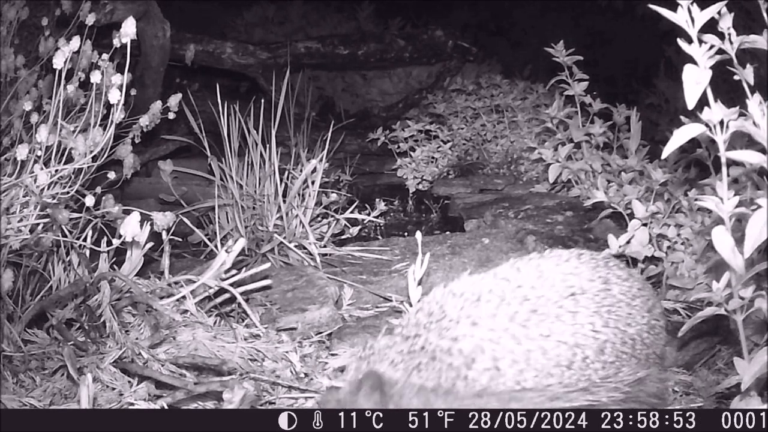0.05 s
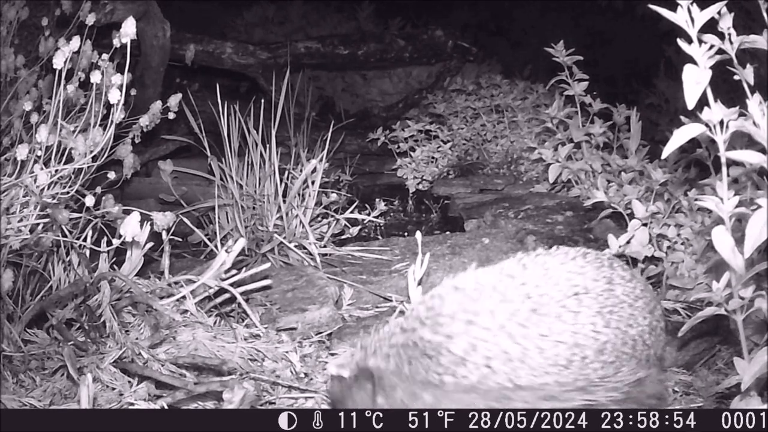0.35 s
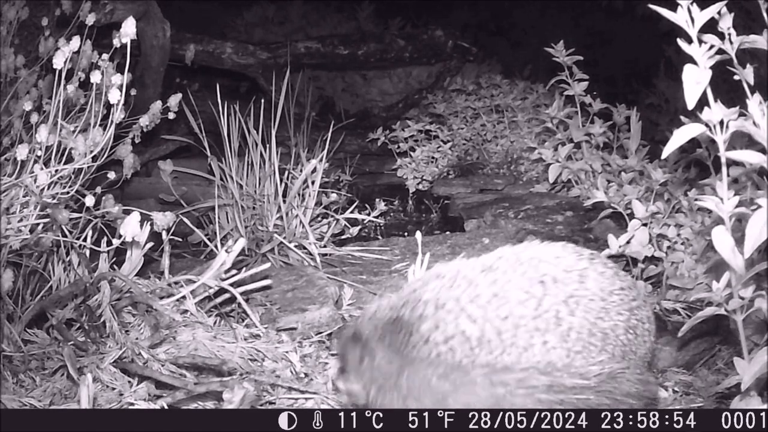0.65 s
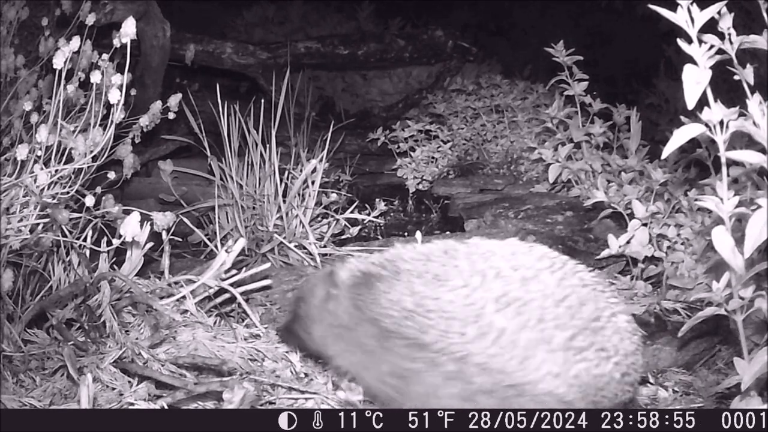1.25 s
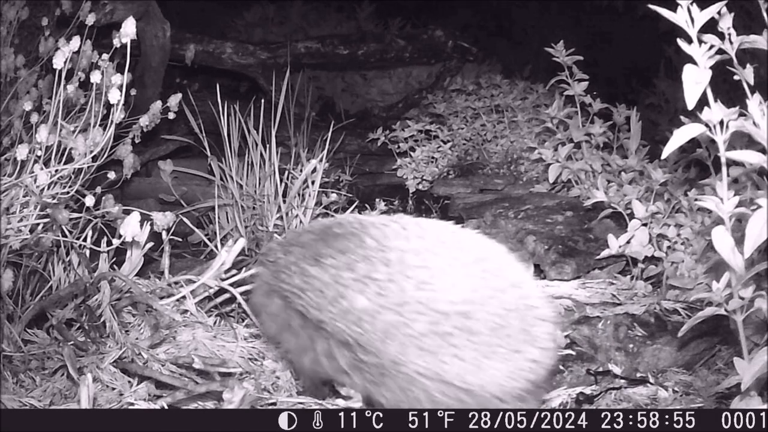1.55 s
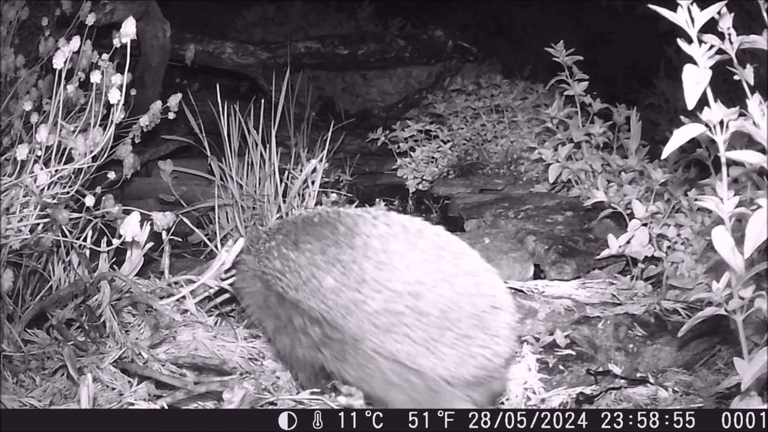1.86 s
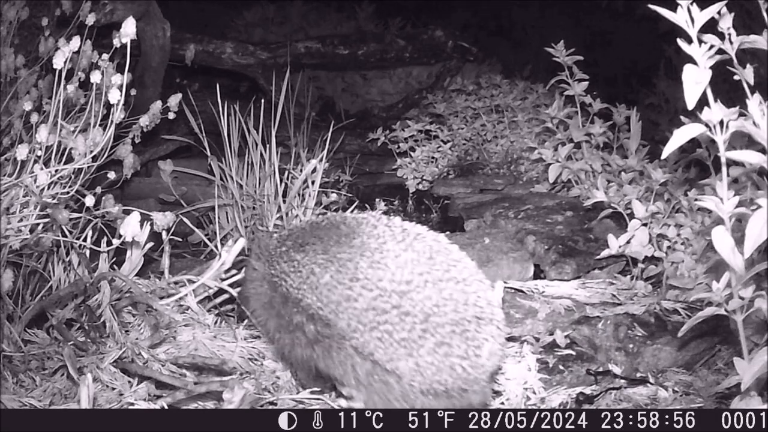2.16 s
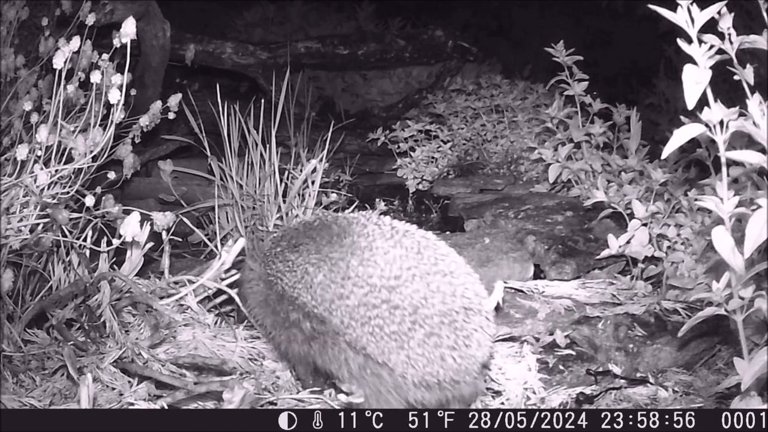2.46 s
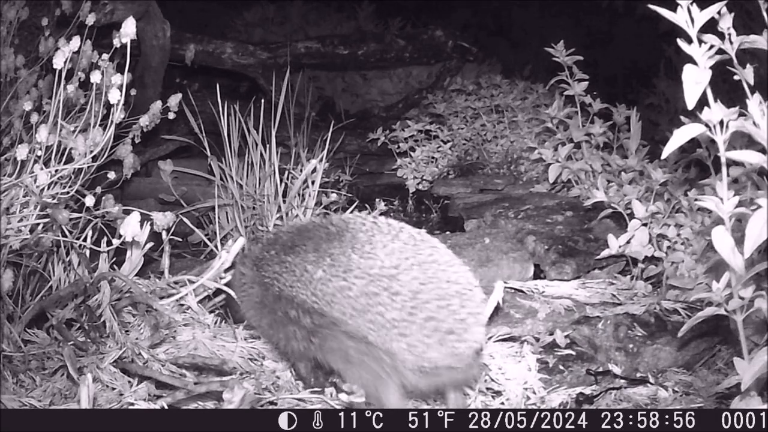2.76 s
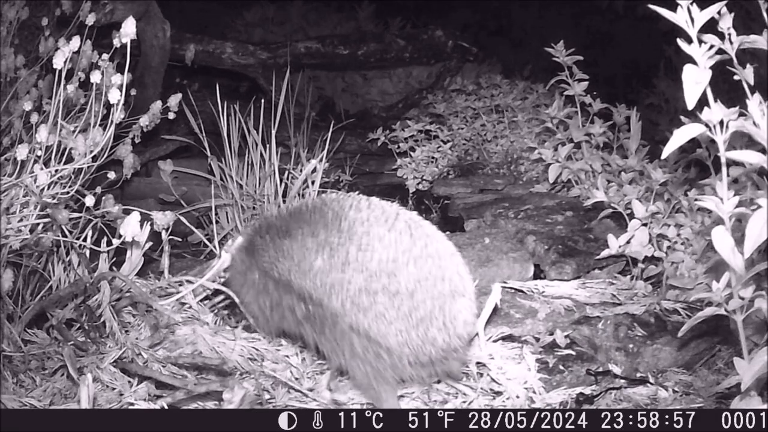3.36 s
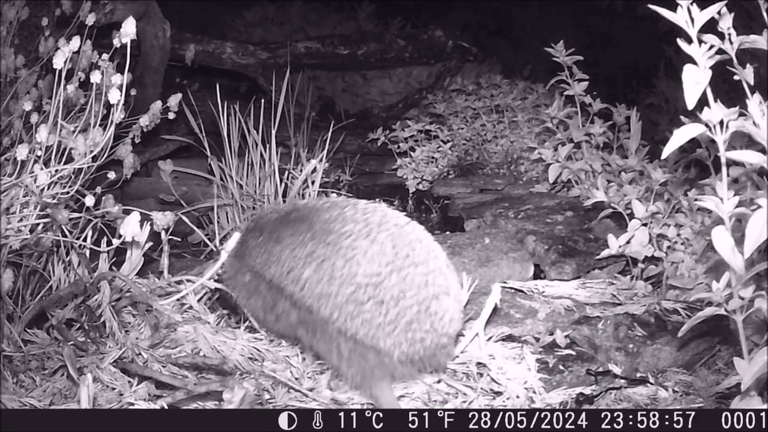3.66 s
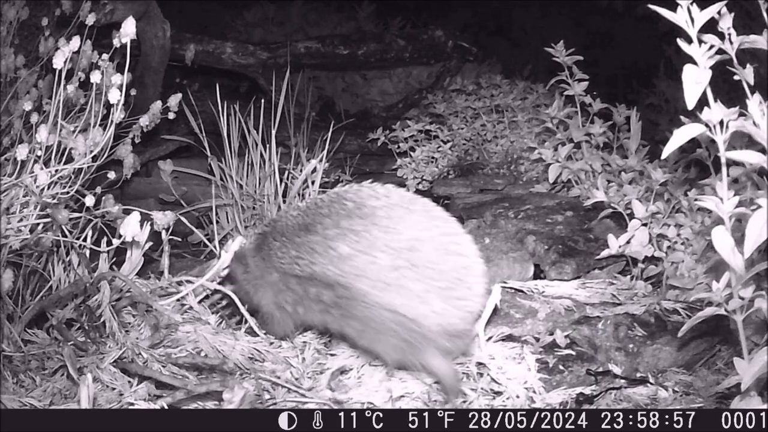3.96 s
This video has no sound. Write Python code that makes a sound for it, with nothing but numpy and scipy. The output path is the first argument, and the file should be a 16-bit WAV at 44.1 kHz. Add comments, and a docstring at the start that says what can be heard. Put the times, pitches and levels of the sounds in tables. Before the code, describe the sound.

A camera's own hiss and pulsing hum, while a hedgehog faintly ticks over dry litter.

```python
"""A steady hiss and a low throbbing hum come first: a trail camera's own noise in a still night garden.
Its electronics work in a cycle five times a second, which drives the throb and a faint pulsing whine.
Under that noise, close to the microphone, a hedgehog shuffles over dry litter and a few twigs tick.
Faint, soft low thuds sit in the background noise, with one stronger dull bump near the end."""
import sys
import numpy as np
from scipy import signal
from scipy.fft import rfft, irfft, next_fast_len
from scipy.io import wavfile

SR = 44100
rng = np.random.default_rng(int(sys.argv[2]) if len(sys.argv) > 2 else 0)


def dump(signal):
    """Clip the signal to [-1, 1] and save it as 16-bit WAV at the path in sys.argv[1]."""
    limited = np.clip(np.atleast_2d(signal).T, -1, 1)
    pcm = np.round(limited * 32767).astype(np.int16)
    wavfile.write(sys.argv[1], SR, pcm)


N = 176400
CYCLE_HZ, BURST_START_S = 5, .072  # the camera's bursts of work


def amp(db):
    """Decibels to amplitude."""
    return 10 ** (np.asarray(db) / 20)


def unit(x):
    """Scale to rms 1."""
    return x / np.sqrt(np.mean(x ** 2) + 1e-20)


def along(points, hz):
    """Interpolate (Hz, value) points on a log axis."""
    f, v = np.transpose(points)
    return np.interp(np.log(hz + 1), np.log(f + 1), v)


def filtered(x, response):
    """Shape x by a frequency response."""
    size = next_fast_len(len(x) + SR // 2)
    return irfft(rfft(x, size) * response(np.fft.rfftfreq(size, 1 / SR)), size)[:len(x)]


def noise(spectrum):
    """Coloured noise of rms 1."""
    return unit(filtered(rng.standard_normal(N), lambda hz: amp(along(spectrum, hz))))


def add(out, s, sound):
    """Mix a sound in at time s."""
    part = out[max(round(s * SR), 0):][:len(sound)]
    part += sound[:len(part)]


def scatter(cycles, spread):
    """A random offset, held through each cycle."""
    return spread * rng.standard_normal(size=32)[cycles.astype(int)]


def throb(frame_hz=20, ripple_db=-50.5, ripple_lag_s=.036, scatter_db=1):
    """The camera's supply ripples with each picture frame, sags under each burst and rebounds."""
    t = np.arange(N) / SR - BURST_START_S

    def swing(lag_s, width_s, db):
        cycles = (t - lag_s) * CYCLE_HZ + 1.5
        from_peak_s = (cycles % 1 - .5) / CYCLE_HZ
        return amp(db + scatter(cycles, scatter_db)) * np.exp(-.5 * (from_peak_s / width_s) ** 2)

    ripple = amp(ripple_db) * np.cos(2 * np.pi * frame_hz * (t - ripple_lag_s))
    sag = swing(lag_s=.04, width_s=.022, db=-48.7)
    rebound = swing(lag_s=.087, width_s=.014, db=-47.1)
    return ripple - sag + rebound


# noise floor of the microphone (frequency [Hz], relative density [dB])
HISS_SPECTRUM = [(20, 22), (42, 16.5), (65, 12.5), (82, 8.5), (106, 11), (150, 4.5), (300, -0.5),
                 (550, -5.5), (1000, -8.5), (1800, -12), (2750, -14.5), (3000, -17.5), (3190, -26.5),
                 (3380, -19), (4250, -19.5), (4750, -25), (5200, -24.5), (5650, -21.5), (6400, -25),
                 (6850, -18), (7400, -18), (7750, -24.5), (8100, -32.5)]


def hiss(db=-59.5):
    """The microphone's steady self-noise."""
    return amp(db) * noise(HISS_SPECTRUM)


# strong lines of the hum (multiple of the cycle rate, rms level [dB])
HUM_HARMONICS = [(5, -74), (6, -65), (7, -75), (10, -71), (12, -75), (13, -78), (14, -77), (20, -79.5),
                 (22, -71.5), (26, -79.5), (36, -89.5), (40, -85), (42, -83), (44, -88), (46, -84),
                 (60, -93.5), (88, -92)]
# weak lines between and above them (frequency [Hz], relative level [dB])
BUZZ_SPECTRUM = [(40, -5), (65, -5), (110, -9), (160, -15), (290, -15.5), (450, -19), (900, -21.5),
                 (2500, -42), (7000, -45.5)]


def hum(buzz_db=-78):
    """The supply ripple repeats with each cycle: a few strong lines over a comb of weak ones."""
    size = SR // CYCLE_HZ
    hz = np.fft.rfftfreq(size, 1 / SR)
    lines = amp(along(BUZZ_SPECTRUM, hz)) * (hz > 0)
    lines *= amp(buzz_db) / np.linalg.norm(lines)
    for multiple, db in HUM_HARMONICS:
        lines[round(multiple)] = amp(db)
    phases = np.exp(2j * np.pi * rng.random(len(hz)))
    cycle = irfft(lines * phases, size) * size / np.sqrt(2)
    return np.resize(cycle, N)


# whine inside the camera (frequency [Hz], relative density [dB])
WHINE_SPECTRUM = [(1000, 0), (3000, -3), (3200, -2.5), (3700, -7.5), (4150, 3.5), (4750, -4), (5200, -6),
                  (5520, 1), (5800, -2.5), (6000, -5), (6400, -9), (6700, -7), (7150, 3.5), (7900, -14.5)]
# narrow, unsteady tones in it (frequency [Hz], rms level during a burst [dB])
WHINE_PEAKS = [(3963, -98), (5470, -91), (7116, -99.5)]
# the switching tick (frequency [Hz], relative density [dB])
SWITCH_SPECTRUM = [(300, 4), (900, 0), (2500, -3), (4800, 1), (7500, -1)]


def whine(db=-79, scatter_db=.97, tone_width_hz=150, tick_db=-73.5, tick_decay_s=.005):
    """Once a cycle the electronics tick on and whine briefly; bursts vary in length and strength."""
    attack_s, release_s = .001, .011
    cycles = (np.arange(N) / SR - BURST_START_S) * CYCLE_HZ + 1
    age_s = cycles % 1 / CYCLE_HZ
    hold_s = .06 + scatter(cycles, .0083)
    gate = np.clip(age_s / attack_s, 0, 1) * np.clip(1 - (age_s - hold_s) / release_s, 0, 1)
    burst = amp(db + scatter(cycles, scatter_db)) * noise(WHINE_SPECTRUM)
    for hz, tone_db in WHINE_PEAKS:
        tone = filtered(rng.standard_normal(N), lambda f: 1 / (1 + (2 * (f - hz) / tone_width_hz) ** 2))
        burst += amp(tone_db + scatter(cycles, scatter_db)) * unit(tone)
    tick_envelope = amp(tick_db + scatter(cycles, scatter_db)) * np.exp(-age_s / tick_decay_s)
    return gate * burst + tick_envelope * noise(SWITCH_SPECTRUM)


# modes of dry twigs on the garden floor (frequency [Hz], relative level [dB], t60 [s])
TWIG_MODES = [(758, 0, 0.017), (1040, -1.5, 0.014), (1440, -6.5, 0.034), (1770, -3, .012),
              (2080, -2.5, 0.03), (2623, -0.5, 0.021), (3750, -6, 0.011), (4550, 3, 0.0089),
              (5710, -2.5, 0.011), (7080, 2, .008)]


def twig(low_hz, high_hz, favoured_hz, muted_hz, crack_db):
    """A twig cracks and rings; the point of contact favours one mode and mutes another."""
    attack_s, crack_t60_s = .00015, .0069
    contact_db, contact_octaves = 5, .18
    t = np.arange(SR // 20) / SR
    near = lambda hz, centre_hz: np.exp(-(np.log2(hz / centre_hz) / contact_octaves) ** 2)
    ring = np.zeros(len(t))
    for hz, db, t60 in TWIG_MODES:
        mode_db = db + contact_db * (near(hz, favoured_hz) - near(hz, muted_hz))
        ring += amp(mode_db - 60 * t / t60) * np.sin(2 * np.pi * (hz * t + rng.random()))
    crack = amp(crack_db - 60 * t / crack_t60_s) * rng.standard_normal(len(t))
    band = signal.butter(5, [low_hz, high_hz], 'band', fs=SR, output='sos')
    return signal.sosfilt(band, (ring + crack) * (1 - np.exp(-t / attack_s)))


# twigs underfoot, close to the microphone
# (time [s], gain [dB], low edge [Hz], high edge [Hz], favoured [Hz], muted [Hz], relative crack [dB])
FOOT_TICKS = [(1.3675, -64, 550, 1900, 800, 2600, 3), (1.535, -67, 800, 2400, 1750, 2600, -2),
              (1.543, -55, 820, 2270, 1510, 2700, 7), (2.9733, -61, 1910, 7700, 2660, 3470, -8),
              (3.8314, -59.5, 560, 7360, 2270, 4500, -1)]


def litter(rustles_per_s=12, rustle_db=-84.5, spread_db=4.5):
    """Dry litter gives under the feet: a few clear ticks, with tiny random ones between them."""
    out = np.zeros(N)
    for s, db, *timbre in FOOT_TICKS:
        add(out, s, amp(db) * twig(*timbre))
    for when, size, colour in rng.random((round(rustles_per_s * N / SR), 3)):
        low_hz = 300 * 4 ** colour
        tick = twig(low_hz, 3 * low_hz, favoured_hz=2 * low_hz, muted_hz=low_hz, crack_db=2)
        add(out, when * N / SR, amp(rustle_db + spread_db * size) * tick)
    return out


# rumble of the ground near the camera (frequency [Hz], relative density [dB])
GROUND_SPECTRUM = [(30, -27), (60, 2), (80, 3.5), (110, -6.5), (150, -17.5), (400, -31), (1500, -43),
                   (5000, -68)]


def shuffle(start_s=3.47, length_s=.34, db=-58.5):
    """The hedgehog drags its body over the ground: a low rumble swells and fades."""
    progress = np.clip((np.arange(N) / SR - start_s) / length_s, 0, 1)
    return amp(db) * np.sin(np.pi * progress) * noise(GROUND_SPECTRUM)


# faint thuds in the background noise, then one stronger dull bump near the end
# (time [s], gain [dB], pitch [Hz], rise [s], t60 [s])
LOW_THUDS = [(.232, -61.5, 189, 0.011, 0.23), (.255, -63, 283, 0.0055, .14), (.482, -58, 226, 0.0049, 0.18),
             (.875, -59.5, 209, 0.011, 0.19), (.925, -60, 157, .006, 0.12), (3.08, -68, 210, .008, 0.094),
             (3.858, -44.5, 105.6, 0.025, 0.46)]


def thuds():
    """Each thud is a low, damped tone with a soft onset."""
    out, t = np.zeros(N), np.arange(SR // 2) / SR
    for s, db, hz, rise_s, t60 in LOW_THUDS:
        envelope = amp(db - 60 * t / t60) * (1 - np.exp(-t / rise_s))
        add(out, s, envelope * np.sin(2 * np.pi * hz * t))
    return out


def scene():
    """One microphone in the garden: the camera's own noise, the hedgehog nearby and low thuds."""
    camera = hiss() + throb() + hum() + whine()
    return (camera + litter() + thuds() + shuffle())[None]


def record(dry):
    """The camera keeps nothing above its band limit."""
    top_hz, taper_hz = 8080, 100
    low_pass = lambda hz: np.clip((top_hz - hz) / taper_hz, 0, 1)
    return np.array([filtered(channel, low_pass) for channel in dry])


dry = scene()
out = record(dry)
dump(out)
```